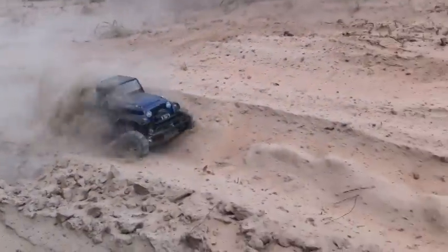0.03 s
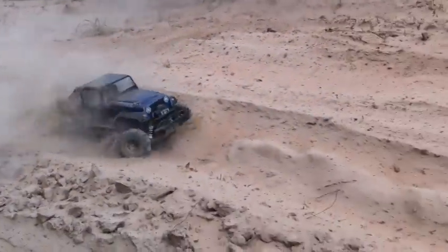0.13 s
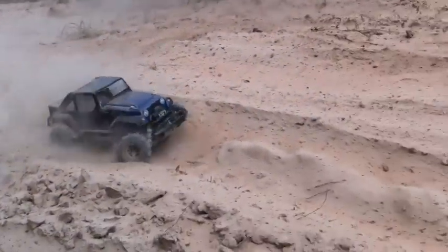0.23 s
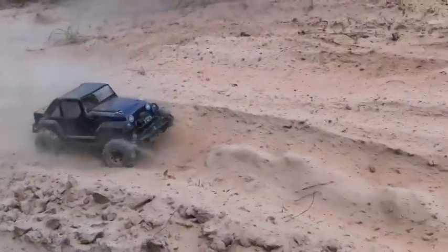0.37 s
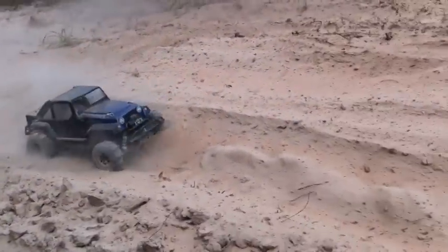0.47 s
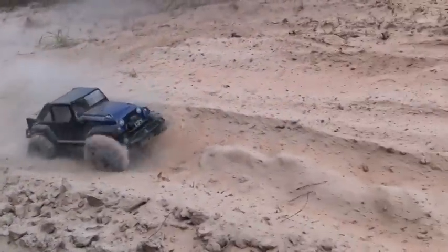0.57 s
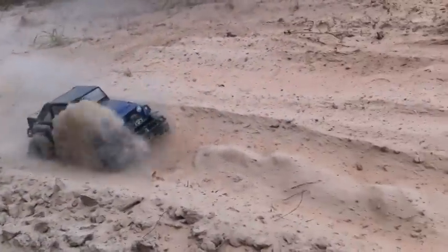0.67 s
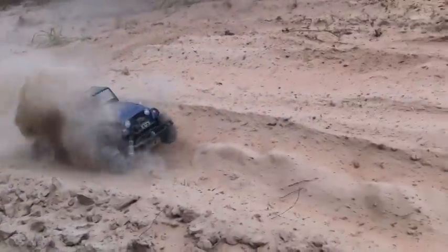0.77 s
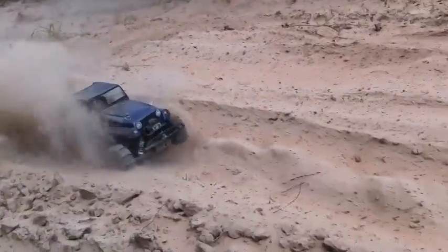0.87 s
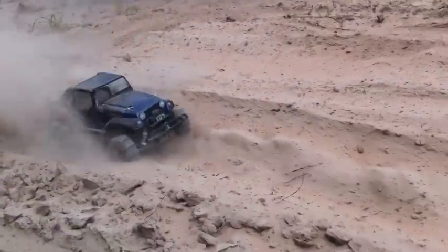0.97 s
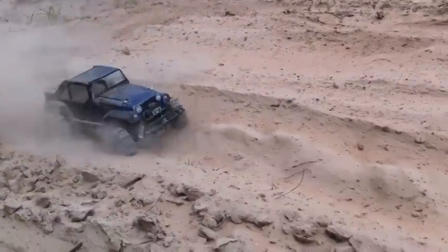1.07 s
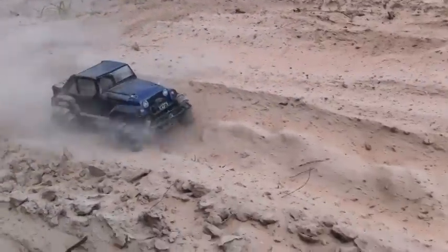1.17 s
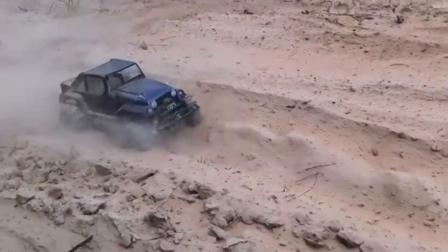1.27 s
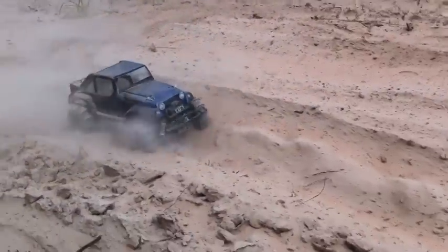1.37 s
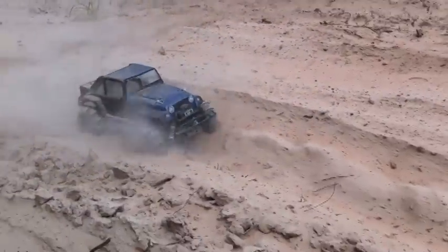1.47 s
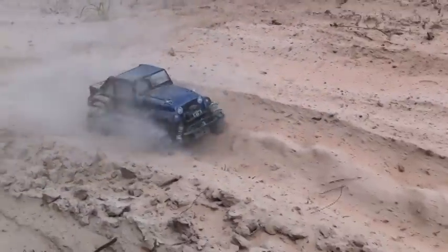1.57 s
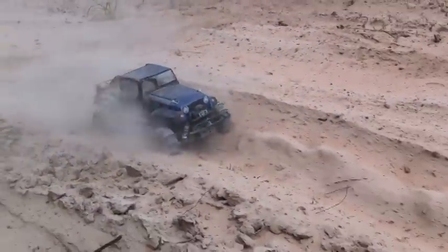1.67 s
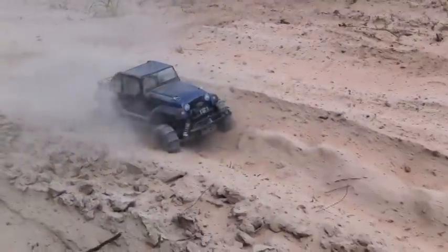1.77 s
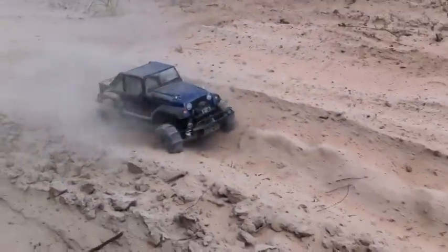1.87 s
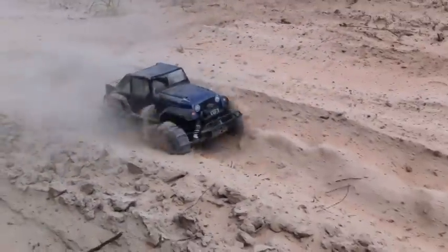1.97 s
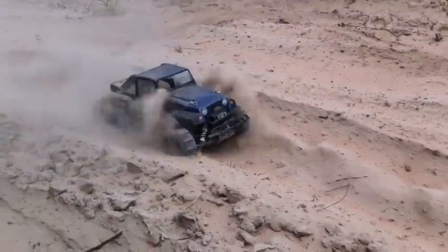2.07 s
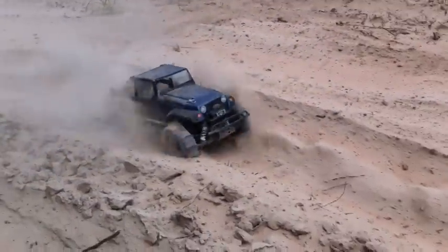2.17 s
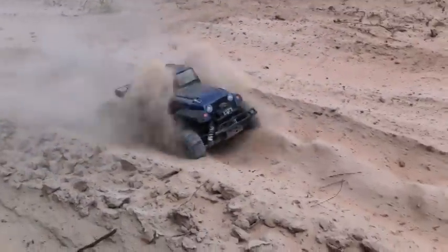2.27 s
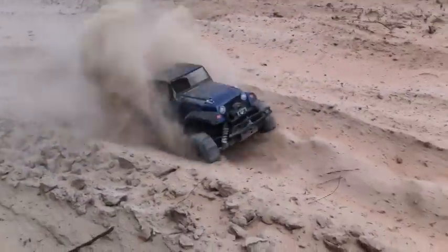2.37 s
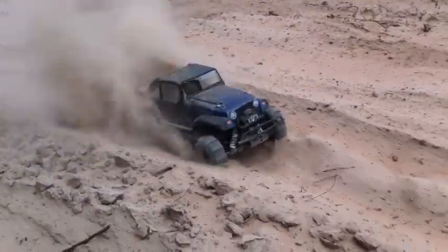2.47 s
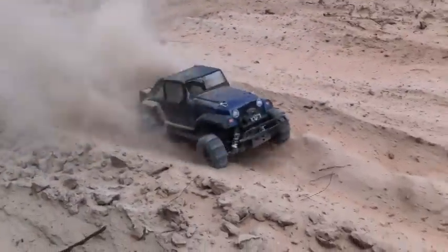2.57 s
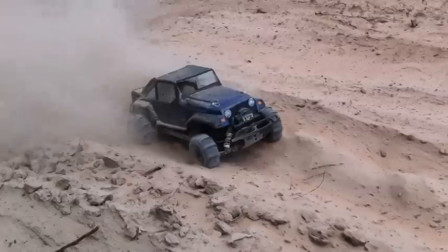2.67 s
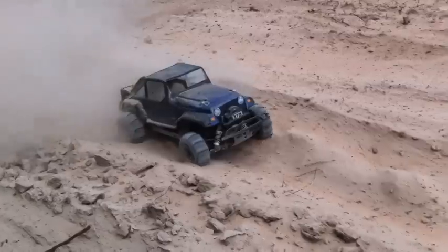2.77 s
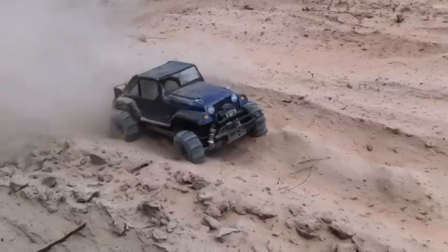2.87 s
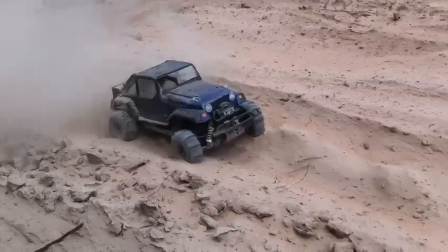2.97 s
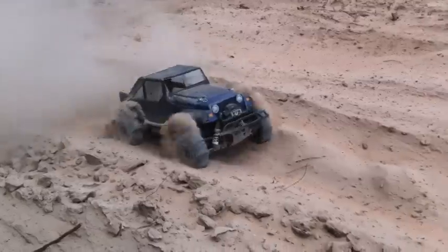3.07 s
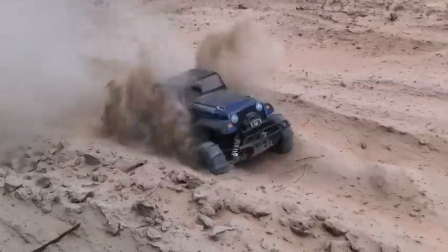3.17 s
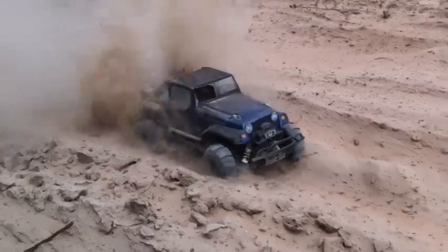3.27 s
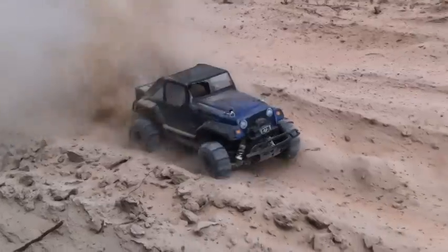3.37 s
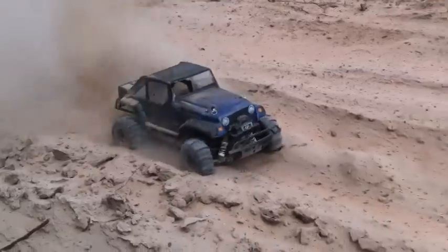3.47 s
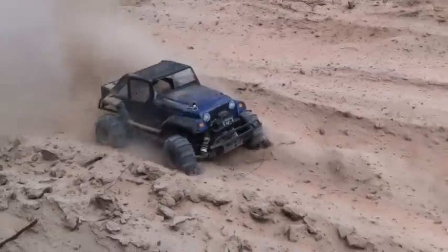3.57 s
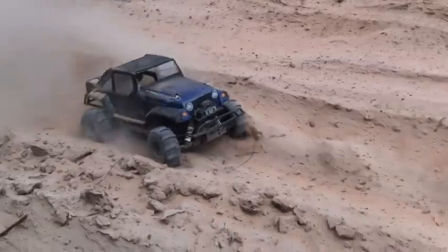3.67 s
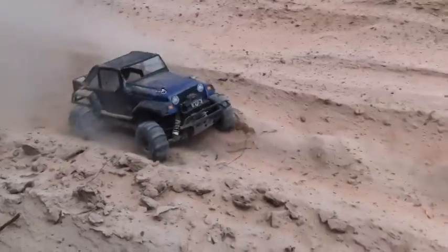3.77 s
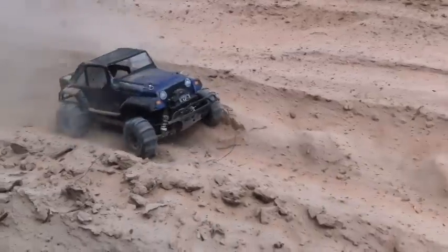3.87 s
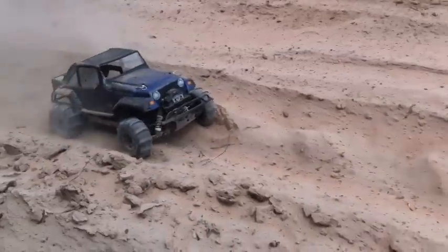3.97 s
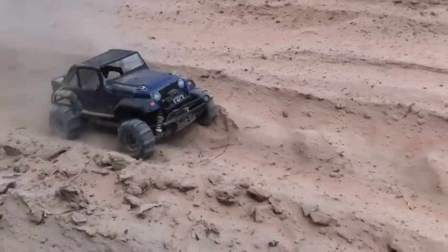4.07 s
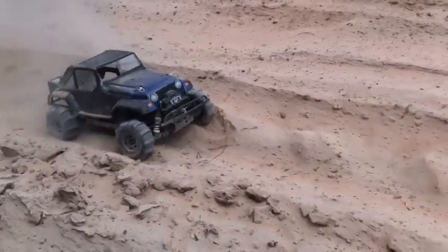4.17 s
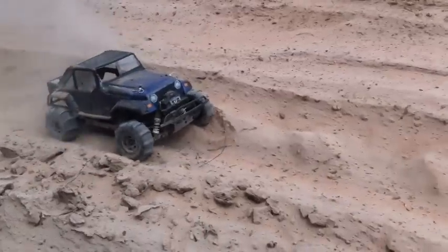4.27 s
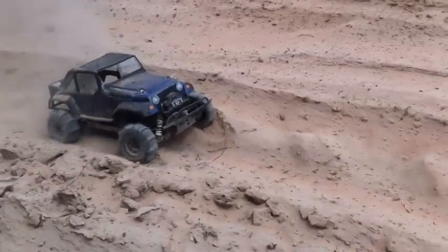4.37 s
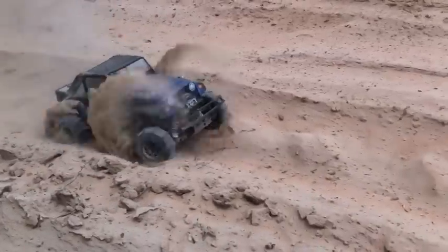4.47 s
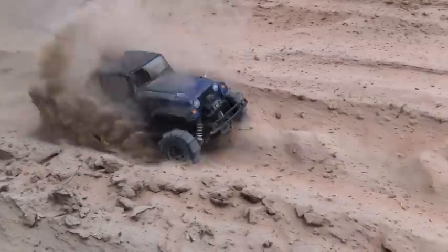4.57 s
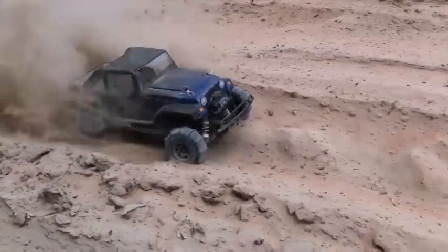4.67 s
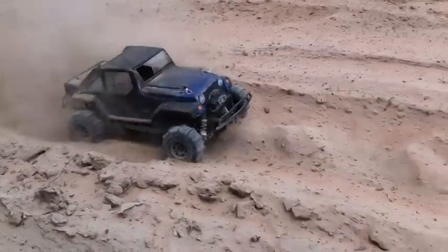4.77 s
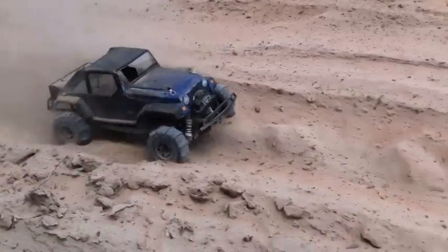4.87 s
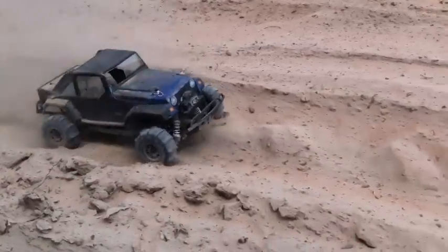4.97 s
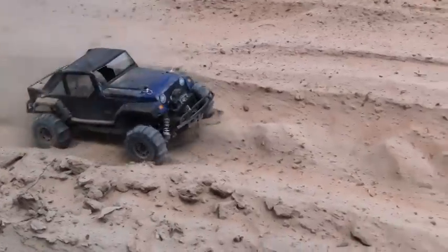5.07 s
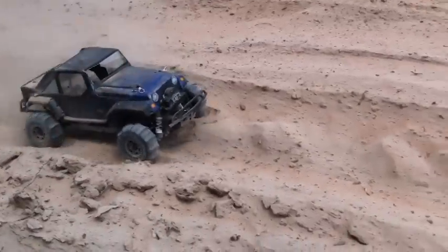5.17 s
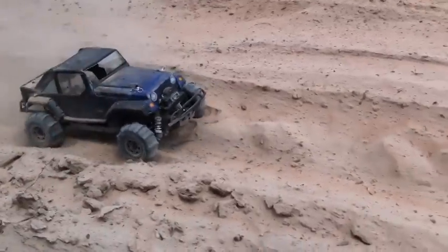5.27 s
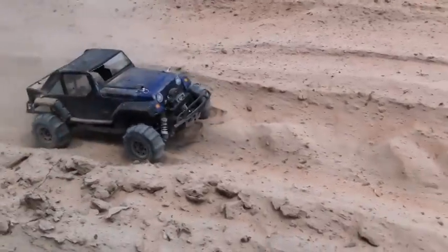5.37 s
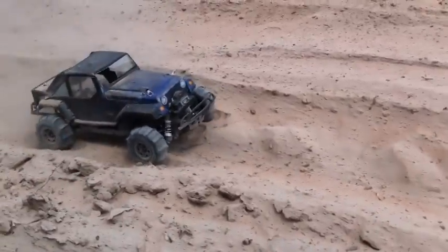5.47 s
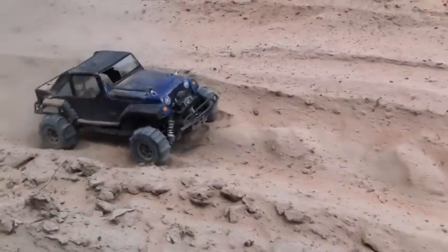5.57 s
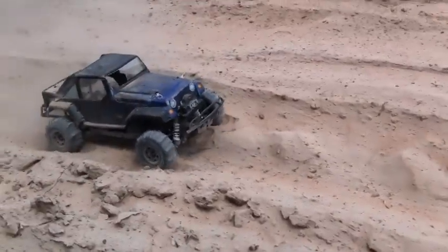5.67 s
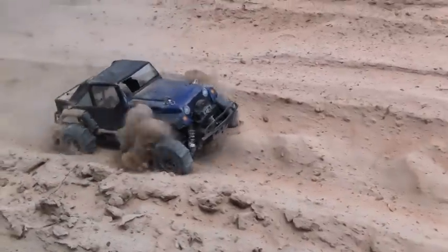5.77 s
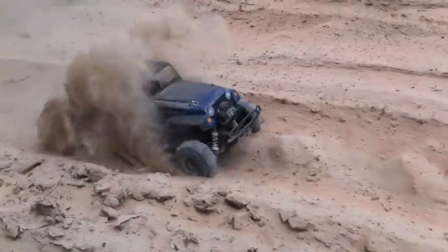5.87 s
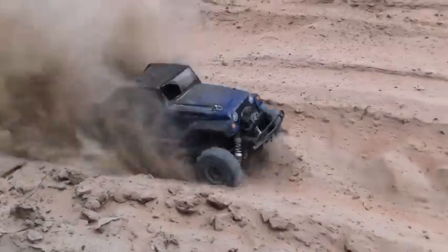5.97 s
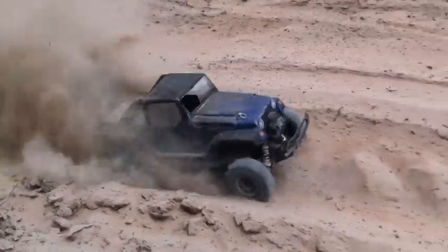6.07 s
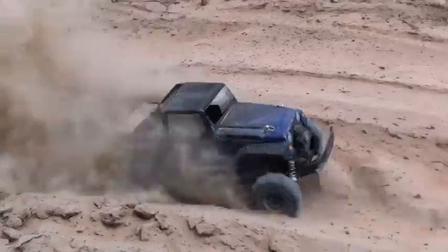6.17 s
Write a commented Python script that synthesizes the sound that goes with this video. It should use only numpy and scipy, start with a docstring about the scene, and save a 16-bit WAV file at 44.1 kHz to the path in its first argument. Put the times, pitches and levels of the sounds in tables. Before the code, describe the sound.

Outdoors on loose sand, a small electric truck revs and lets off again and again, its gears giving a high, gliding whine over rough grinding and scraping. After two quick bursts, a gust knocks on the nearby microphone. Four more bursts follow, each starting with a stuttering clatter, with light ticks of falling grit and faint servo whirs in the gaps. Low wind and a soft hiss lie underneath.

```python
"""On loose sand, a few metres from one microphone, an electric model truck digs its wheels in.
Throttle bursts kick off in jerks, then two gear stages whine over a gritty grind, ribbed by the thin
body shell. The speed controller whistles, the steering servo sings and thrown sand ticks down.
Wind rumbles and thumps on the microphone; a faint rush, a far drone and thin chirps sit in the hiss."""
import sys
import numpy as np
from scipy import signal
from scipy.fft import rfft, irfft
from scipy.io import wavfile
from scipy.ndimage import uniform_filter1d

SR = 44100
rng = np.random.default_rng(int(sys.argv[2]) if len(sys.argv) > 2 else 0)


def int16_out(signal):
    """Quantize to a 16-bit WAV file."""
    q = np.round(np.clip(np.atleast_2d(signal).T, -1, 1) * 32767)
    wavfile.write(sys.argv[1], SR, q.astype(np.int16))


N = 274743
TIME = np.arange(N) / SR


def undb(db):
    """Decibels to gain."""
    return 10 ** (np.asarray(db) / 20)


def unit(x):
    """Scales to rms 1."""
    return x / np.sqrt(np.mean(x ** 2))


def automation(table, fade_s=0.0071):
    """The samples a breakpoint table spans, a fade in and out, and one curve per column."""
    times, *cols = np.transpose(table)
    span = slice(int(times[0] * SR), min(int(times[-1] * SR), N))
    t = TIME[span]
    since_start = t - times[0] + (times[0] <= 0)  # no fade at either end of the scene
    until_stop = times[-1] - t + (span.stop >= N - 300)
    fade = np.clip(np.minimum(since_start, until_stop) / fade_s, 0, 1)
    return span, fade, [np.interp(t, times, col) for col in cols]


def region(start, stop, fade_s):
    """An event's samples, its fade in and out, and seconds since its start."""
    span, fade, (t,) = automation([(start, 0.), (stop, stop - start)], fade_s)
    return span, fade, t


def wander(rate_hz, size=N):
    """Smooth random modulation: sample and hold, slewed twice, spread near 1."""
    hold = int(SR / rate_hz)
    steps = np.repeat(rng.standard_normal(size // hold + 3), hold)
    return 1.4 * uniform_filter1d(uniform_filter1d(steps, hold), hold)[hold:hold + size]


def ring(x, hz, width_hz):
    """One resonance, gain 1 at the centre."""
    return signal.lfilter(*signal.iirpeak(hz, hz / width_hz, SR), x)


def colour(x, eq):
    """Shapes noise with an EQ curve of (freq_hz, gain_db) points; rms 1."""
    hz, db = np.transpose(eq)
    f = np.arange(len(x) // 2 + 1) * SR / len(x) + 1
    return unit(irfft(rfft(x) * undb(np.interp(np.log(f), np.log(hz), db)), len(x)))


def tone(hz, rough, flutter_db, skirt_hz):
    """A partial with a pure core and a noisy skirt; rough (0-1) is the skirt's share of the power."""
    skirt = (wander(skirt_hz, len(hz)) + 1j * wander(skirt_hz, len(hz))) / np.sqrt(2)
    rough = np.clip(rough, 0, 1)
    flutter = undb(flutter_db * wander(43.96, len(hz)))
    envelope = flutter * (np.sqrt(1 - rough) + np.sqrt(rough) * skirt)
    return np.sqrt(2) * np.imag(envelope * np.exp(2j * np.pi * np.cumsum(hz) / SR))


def shell(x, spacing_hz=330, width_hz=70, floor=.35):
    """Narrow, unevenly spaced resonances that give a ribbed sound, drawn at random for each event."""
    f = np.arange(len(x) // 2 + 1) * SR / len(x)
    modes = np.cumsum(spacing_hz * rng.uniform(.4, 1.6, 60))
    above = np.clip(np.searchsorted(modes, f), 1, len(modes) - 1)
    detune_hz = np.minimum(abs(f - modes[above]), abs(f - modes[above - 1]))
    gain = floor + 1 / np.sqrt(1 + (2 * detune_hz / width_hz) ** 2)
    return irfft(rfft(x) * gain / np.sqrt(np.mean(gain ** 2)), len(x))


# Pinion whine, one curve per throttle burst: time_s, pitch_hz, level_db
PINION_CURVES = [
    [(0.0, 2011, -21), (0.041, 2040, -25), (0.071, 2112, -29.5), (0.096, 1877, -33), (0.126, 1554, -49.5)],
    [(0.801, 1004, -49.5), (0.831, 1504, -42.5), (0.866, 2024, -43), (0.921, 1955, -45.5),
     (0.951, 1502, -41.5), (0.996, 1258, -46)],
    [(2.321, 608.1, -43.5), (2.356, 980.4, -38.5), (2.387, 1222, -34), (2.467, 1710, -29.5),
     (2.516, 1740, -34), (2.546, 1499, -30.5), (2.571, 1180, -38)],
    [(3.231, 1000, -33.5), (3.253, 1069, -39.5), (3.273, 1521, -34.5), (3.293, 1723, -39.5),
     (3.321, 1910, -36.5), (3.371, 1726, -43)],
    [(4.596, 1153, -40.5), (4.626, 1304, -34.5), (4.656, 1429, -33), (4.696, 1321, -40), (4.726, 1052, -33)],
    [(5.951, 1224, -38), (5.985, 1483, -30.5), (6.066, 1832, -32), (6.129, 2076, -22.5),
     (6.191, 2321, -24.5), (6.231, 2457, -35.5)],
]
# Slower gear stage, per burst: pitch_ratio to the pinion
SLOW_STAGE_RATIOS = [0.4, .4, .377, .39, .4, .356]
# Whine texture per burst, cleanest when the wheels spin free: roughness (0-1), waver_ratio
WHINE_TEXTURE = [(.25, .012), (.5, .02), (.18, .008), (.15, .01), (.4, .02), (.12, .005)]
# Layer mix at each burst's top speed: overtones_db, slow_stage_db
GEAR_MIX = [(-41.5, -67.5), (-51, -42), (-41, -38), (-42, -34.5), (-39, -37.5), (-36.5, -27)]


def gears(pinion_teeth=9, throb_teeth=28, throb_depth=.35, overtone_db_per_oct=9, stage_db_per_oct=18):
    """Meshing teeth whine: the pinion, two smeared overtones, a slower stage and the unbalanced shaft."""
    out = np.zeros(N)
    bursts = zip(PINION_CURVES, SLOW_STAGE_RATIOS, WHINE_TEXTURE, GEAR_MIX)
    for curve, ratio, (rough, waver), (overtones_db, stage_db) in bursts:
        span, fade, (hz, db) = automation(curve)
        octaves = np.log2(hz / hz.max())
        hz = hz * (1 + waver * wander(60, len(hz)))
        throb = 1 + throb_depth * tone(hz / throb_teeth, .3, 2, 30)  # once per turn of an eccentric gear
        mesh = undb(db) * throb * tone(hz, rough, 1, 250)
        overtones = tone(2 * hz, .72, 3, 600) + undb(-4) * tone(3 * hz, .95, 3, 1200)
        overtones *= undb(overtones_db + overtone_db_per_oct * octaves)
        overtones = shell(fade * overtones, floor=.3)  # they flare as they glide across shell modes
        stage = tone(ratio * hz, rough, 1, 120)
        shaft = undb(-14) * tone(hz / pinion_teeth, 0.147, 2, 45)
        low_whine = undb(stage_db + stage_db_per_oct * octaves) * (stage + shaft)
        out[span] += fade * (mesh + overtones + low_whine)
    return out


# Chassis resonances: pitch_hz, width_hz, gain_db
CHASSIS_MODES = [(766, 546, 21.5), (1610, 63, -33.5), (2193.6, 367, 20.5), (3220, 100, -33),
                 (4320, 56, -2.5), (5248, 360, 4.5), (6000, 73, -20), (6250, 95, -6.5), (6400, 80, -55),
                 (10650, 320, -28)]
# Broad chassis colour: freq_hz, gain_db
CHASSIS_EQ = [(260, -65.5), (450, -10.5), (734, 0), (1200, 0.5), (1810, 1), (2100, -2.5), (2510, -15),
              (5430, -14.5), (7410, -54), (12100, -22), (15600, -72)]


def chassis_noise(scatter_db=1.0, modes_db=-2, flare_db=3.5, crossover_hz=3200):
    """Dense tooth and grit impacts through the chassis, each mode flaring alone; low and high bands."""
    impacts = rng.standard_normal(N) * undb(scatter_db * rng.exponential(size=N))
    modes = sum(undb(db + flare_db * wander(45)) * ring(impacts, hz, width_hz)
                for hz, width_hz, db in CHASSIS_MODES)
    sound = colour(impacts, CHASSIS_EQ) + undb(modes_db) * unit(modes)
    f = np.arange(N // 2 + 1) * SR / N
    low = irfft(rfft(sound) / (1 + (f / crossover_hz) ** 6), N)
    return unit(low), unit(sound - low)


# Wheelspins per burst: four times_s (once sorted: start, full, lift, stop), level_db, relative treble_db
WHEELSPINS = [
    [(-.05, 0, 0.0978, 0.2293, -35, 0), (.12, .17, 0.341, 0.438, -53, -15),
     (.435, .45, 0.511, .62, -52.5, -6)],
    [(.72, 0.847, 0.9498, 1.03, -38, -7.5)],
    [(1.98, 2.05, 2.294, 2.12, -44, -15.5), (2.11, 2.15, 2.181, 2.235, -40.5, -13),
     (2.23, 2.26, 2.346, 2.31, -55, -7.5), (2.3, 2.43, 2.5485, 2.6, -34.5, -2.5),
     (2.57, 2.6, 2.67, 2.72, -57.5, -2)],
    [(3.115, 3.125, 3.66, 3.2, -49, -12), (3.17, 3.27, 3.35, 3.39, -32.5, -7),
     (3.35, 3.37, 3.46, 3.445, -48, -3), (3.445, 3.455, 3.465, 3.52, -55.5, -5)],
    [(4.57, 4.63, 4.71, 4.745, -34.5, -6), (4.71, 4.735, 4.76, 4.92, -53, -0.5)],
    [(5.86, 5.985, 6.615, 6.3, -31, -6.5)],
]
# The ring that stands out as the truck turns, per burst: pitch_hz, width_hz, relative level_db
RASP_RINGS = [(3700, 300, -10), (3000, 300, -12), (5300, 300, -10), (5550, 350, -6), (2700, 130, -5),
              (4200, 500, -8)]


def grind(swell_db=14, decay_db=30, brighten_db_per_s=30):
    """Drivetrain noise as the tyres grip and slip: each spin swells, brightens with speed and fades."""
    low, high = chassis_noise()
    out = np.zeros(N)
    for spins, (hz, width_hz, rasp_db) in zip(WHEELSPINS, RASP_RINGS):
        loudest_db = max(spin[4] for spin in spins)
        for *times, level_db, treble_db in spins:
            start, full, lift, stop = sorted(times)
            span = slice(max(int(start * SR), 0), min(int(stop * SR), N))
            t = TIME[span]
            db = level_db - np.interp(t, [start, full, lift, stop], [swell_db, 0, 0, decay_db])
            fade = np.clip(np.minimum(t - start, stop - t) / .006, 0, 1)
            treble = undb(treble_db + brighten_db_per_s * (np.minimum(t, lift) - full)) * high[span]
            grip_db = 0.21 * wander(61.66, len(t))
            # the rasp falls away faster than the grind
            rasp_gain = undb(rasp_db + db - loudest_db + 1.19 * wander(50, len(t)))
            rasp = rasp_gain * unit(ring(rng.standard_normal(len(t)), hz, width_hz))
            out[span] += fade * undb(db + grip_db) * shell(low[span] + treble + rasp)
    return out


# Controller whistle on open throttle: start_s, stop_s, level_db
WHISTLE_CUES = [(0, .2, -61.5), (.2, .5, -68), (.65, 1.102, -59.5), (1.95, 2.5, -61), (3.11, 3.35, -60.5),
                (4.5, 4.7, -57.5), (5.82, 6.01, -53.5)]


def controller_whistle(pitch_hz=12169, sag_db_per_s=14):
    """The speed controller chops the current at a constant rate: a thin, high whistle."""
    out = np.zeros(N)
    for start, stop, db in WHISTLE_CUES:
        span, fade, t = region(start, stop, fade_s=0.0257)
        out[span] += fade * undb(db - sag_db_per_s * t) * tone(np.full(len(t), pitch_hz), .3, 2, 120)
    return out


# Wind fader moves: time_s, level_db, relative upper_edge_db
WIND_CURVE = [(0.0, -39, -36), (0.35, -43.5, -20), (0.6, -40, -21.5), (1.2, -33.5, -19.5),
              (1.45, -34, -24.5), (1.96, -40.5, -23.5), (2.69, -40.5, -30), (2.95, -46, -23),
              (3.33, -43.5, -29), (4.09, -49, -17), (4.53, -48.5, -21), (4.77, -45, -18),
              (5.43, -45.5, -31), (5.88, -45.5, -25), (6.23, -41.5, -25)]
# Rumble colour: freq_hz, gain_db
RUMBLE_EQ = [(12, -75), (20, -6.5), (54, -30), (96, -4.5), (152, 0), (211, -5), (256, -8), (321, -4),
             (464, -12), (681, -25.5), (797, -38), (1040, -38.5), (1300, -38), (1690, -43), (2860, -120)]


def wind():
    """Wind on the microphone: third-octave bands flicker separately, and gusts open an upper edge."""
    times, *levels_db = np.transpose(WIND_CURVE)
    db, edge_db = (np.interp(TIME, times, level_db) for level_db in levels_db)
    air = colour(rng.standard_normal(N), RUMBLE_EQ)
    bands_hz = 30 * 2 ** np.arange(0, 5.6, 1 / 3)
    rumble = unit(sum(undb(3 * wander(12)) * ring(air, hz, hz / 3) for hz in bands_hz))
    upper_edge = unit(ring(ring(rng.standard_normal(N), 812, 300), 803, 234))
    return undb(db) * (rumble + undb(edge_db) * upper_edge)


def rush(centre_hz=1976, bed_db=-82, peak_s=1.21, peak_db=-58, rise_db_per_s=43, fall_db_per_s=28):
    """A faint, airy bed that swells once."""
    past_peak = TIME - peak_s
    swell_db = peak_db - np.maximum(-rise_db_per_s * past_peak, fall_db_per_s * past_peak)
    air = unit(ring(ring(rng.standard_normal(N), centre_hz, 1800), centre_hz, 1800))
    return undb(np.maximum(bed_db, swell_db) + 1.2 * wander(25.43)) * air


# Noise floor colour: freq_hz, gain_db
HISS_EQ = [(530, -48), (900, -11.5), (955, -7.5), (1840, -12), (2360, -10), (2570, -11), (15600, -16)]


def hiss(level_db=-64.5):
    """A steady noise floor under everything."""
    return undb(level_db) * colour(rng.standard_normal(N), HISS_EQ)


# Motor jerks: start_s, level_db, ring_hz, relative treble_db, length_s
JERK_HITS = [(0.177, -37, 1950, -13, 0.0256), (0.667, -32, 875, -4.5, 0.0252),
             (0.69, -33, 869, -6.5, 0.0176), (0.707, -28.5, 1106, -5.5, 0.01787),
             (0.766, -34, 1190, -8, 0.0216), (1.98, -37.5, 1987, -3.5, 0.017),
             (1.997, -34, 1360, -9, 0.0192), (2.038, -32.5, 816, -1.5, 0.0163),
             (2.05, -25, 1640, -4.5, 0.0153), (2.068, -28, 1906, -2.5, 0.0164),
             (2.082, -27.5, 1918, -0.5, 0.0115), (2.101, -23.5, 1331, -10, 0.0108),
             (2.122, -28.5, 770, -11, 0.0105), (2.246, -41.5, 1610, -7.5, 0.0086),
             (2.26, -36, 1770, -8.5, 0.0097), (2.278, -32, 1484, -9, 0.0215),
             (2.314, -31, 874, 3.5, 0.0055), (2.336, -29, 824, -3.5, 0.029),
             (2.608, -37.5, 1990, -1.5, 0.0265), (2.634, -45, 1336, 7.5, 0.0099),
             (3.123, -37, 2330, -5.5, 0.0105), (3.138, -31.5, 2376, -17, 0.0168),
             (3.185, -26.5, 1541, -0.5, .019), (3.205, -29, 1405, -7.5, 0.0086),
             (3.219, -24.5, 2130, -0.5, 0.00995), (3.401, -33.5, 1900, 4, 0.0207),
             (3.452, -32, 2000, 5, 0.0112), (4.506, -32.5, 890.7, -14.5, 0.033),
             (4.537, -31.5, 784, -8, 0.0146), (4.55, -22.5, 1144, -13.5, 0.0212),
             (4.581, -27, 900, -11.5, 0.0177), (4.593, -25.5, 933.6, -10, 0.0843),
             (4.779, -41, 1935, -8.5, 0.029), (5.832, -47, 789, 1.5, 0.0097),
             (5.843, -37, 788, 0.5, 0.0185), (5.856, -24.5, 1227, -5.5, 0.0189),
             (5.873, -28, 1023, -9.5, 0.0165), (5.889, -23.5, 1480, -4.5, 0.0186),
             (5.927, -19.5, 2202, -1.5, .017)]


def jerks(skew=.75, trim_db=-9):
    """The motor jerks against the gear play: each short shake favours one ring of the chassis."""
    low, high = chassis_noise()
    out, t = np.zeros(N), TIME[:SR // 10]
    tail = .1 * np.exp(-t / .02)
    for start, db, hz, treble_db, length in JERK_HITS:
        span = slice(int(start * SR), int(start * SR) + len(t))
        shake = shell(low[span] + 0.766 * unit(ring(low[span], hz, 53.3)) + undb(treble_db) * high[span])
        swell = np.sin(np.pi * np.clip(t / length, 0, 1) ** skew)
        out[span] += undb(db + trim_db) * shake * (swell + tail)
    return out


# Single grains landing: start_s, level_db, ring_hz, relative treble_db
SAND_HITS = [(0.416, -40.5, 3690, 2.5), (0.451, -32.5, 2000, -6), (0.47, -32.5, 1690, -11.5),
             (0.479, -38.5, 2910, 3.5), (0.515, -42, 2900, 1.5), (0.529, -39.5, 4600, 2),
             (1.048, -31.5, 3470, -15), (1.328, -39.5, 2150, -9), (2.754, -43, 2220, -18.5),
             (2.787, -40, 5300, -28), (3.52, -39.5, 2100, -22.5), (3.534, -39.5, 2100, -21),
             (3.548, -42, 1770, -17.5), (3.685, -47, 1500, -19.5), (3.765, -46.5, 1800, -20),
             (3.899, -51.5, 2440, -1.5), (4.017, -45.5, 3290, -4), (4.067, -43.5, 2020, -16.5),
             (4.728, -37.5, 2270, 5), (4.817, -40.5, 3670, 5.5), (4.873, -43.5, 3733, -2),
             (4.945, -44, 6150, -12), (4.96, -44.5, 3860, -11), (4.988, -41.5, 4420, -3),
             (5.146, -41.5, 1670, -19)]


def sand_ticks(t60_s=0.0257, trim_db=-7, patter_s=(4.85, 5.15), patter_db=-54.5, patter_hz=3500):
    """Thrown grit cracks on body and ground: a broad ring with a bright edge."""
    out, t = np.zeros(N), TIME[:SR // 10]
    envelope = (1 - np.exp(-t / 0.00067)) * undb(-60 * t / t60_s)
    # the last grains of a throw land at random
    patter = [(np.interp(when, [0, 1], patter_s), patter_db + 8 * size, patter_hz * 2 ** (pitch - .5), -5)
              for when, size, pitch in rng.uniform(size=(6, 3))]
    for start, db, hz, treble_db in [*patter, *SAND_HITS]:
        noise = rng.standard_normal(len(t))
        bright = unit(ring(ring(noise, 9650, 7000), 9650, 7000))
        crack = unit(ring(noise, hz, hz / 2)) + undb(treble_db) * bright
        i = int(start * SR)
        out[i:i + len(t)] += undb(db + trim_db) * crack * envelope
    return out


# Steering moves: start_s, peak_s, stop_s, start_hz, peak_hz, stop_hz, first_db, second_db, third_db
SERVO_MOVES = [(.471, 0.502, .676, 2710, 3070, 2182, -50.5, -53, -61.5),
               (1.171, 1.202, 1.276, 1920, 1912, 2062, -73, -65, -85.5),
               (3.951, 3.975, 4.02, 1940, 2170, 2103, -83, -85, -67.5),
               (4.081, 4.1, 4.14, 2087, 2107, 2127, -85, -85, -72.5),
               (4.201, 4.268, 4.331, 1953, 2157, 2081, -66, -72, -57)]
# Servo rasp per move: roughness (0-1), multiplied by the partial number
SERVO_ROUGHNESS = [.2, .15, .33, .33, .33]


def servo(settle_s=.04, first_db_per_oct=55, third_db_per_oct=-15):
    """The steering servo's small geared motor: three wavering partials in scratchy gear noise."""
    out = np.zeros(N)
    scratch = rng.standard_normal(N) * undb(2.34 * wander(160))
    gear_noise = unit(ring(scratch, 5900, 1500)) + undb(-3) * unit(ring(scratch, 10800, 4500))
    waver = 1 + .008 * wander(60)
    for move, rough in zip(SERVO_MOVES, SERVO_ROUGHNESS):
        start, peak, stop, *pitches_hz, first_db, second_db, third_db = move
        span, fade, t = region(start, stop, fade_s=.012)
        settled = max(stop - settle_s, peak + .01)
        glide_hz = np.interp(t + start, [start, peak, settled], pitches_hz)
        hz = uniform_filter1d(glide_hz, size=SR // 50, mode="nearest")
        # as the pitch drops the weight shifts from the first partial to the third
        octaves = np.log2(hz / hz.max())
        first_db += first_db_per_oct * octaves
        third_db += third_db_per_oct * octaves
        partials = sum(undb(db) * tone(k * hz * waver[span], rough * k, 2.5, 350)
                       for k, db in enumerate([first_db, second_db, third_db], 1))
        out[span] += fade * (partials + undb(third_db - 3) * gear_noise[span])
    return out


# Wind pops: start_s, level_db, pitch_hz
GUST_HITS = [(1.03, -19.5, 150.7), (1.043, -21, 191.6), (1.088, -19.5, 123.1), (1.115, -15, 210),
             (1.129, -19, 154), (1.181, -15.5, 208), (1.199, -23, 168.7)]


def gust_thumps():
    """Gusts knock the microphone's membrane: a cycle or two of bass each."""
    out, t = np.zeros(N), TIME[:SR // 10]
    envelope = np.exp(-((t - .01) / 0.00452) ** 2)
    for start, db, hz in GUST_HITS:
        i = int(start * SR)
        out[i:i + len(t)] += undb(db) * np.sin(2 * np.pi * hz * t) * envelope
    return out


def drone(start_s=1.1, stop_s=1.85, from_hz=621, to_hz=855, glide_s=0.17, db=-49.5, sag_db_per_s=29):
    """A blurred tone from far off glides up and fades."""
    out = np.zeros(N)
    span, fade, t = region(start_s, stop_s, fade_s=.02)
    hz = to_hz - (to_hz - from_hz) * np.exp(-t / glide_s)
    out[span] = fade * undb(db - sag_db_per_s * t) * tone(hz, 0.65, 1.5, 50.57)
    return out


# Faint chirps: start_s, stop_s, start_hz, stop_hz, level_db
CHIRP_CUES = [(3.72, 3.79, 3600, 3500, -76), (3.845, 3.87, 3900, 3400, -72), (3.97, 4.09, 3350, 3150, -76)]


def chirps():
    """Thin falling whistles, perhaps a far bird, half buried in the hiss."""
    out = np.zeros(N)
    for start, stop, start_hz, stop_hz, db in CHIRP_CUES:
        span, fade, t = region(start, stop, fade_s=0.0093)
        out[span] += fade * undb(db) * tone(np.linspace(start_hz, stop_hz, len(t)), .3, 2, 150)
    return out


def scene():
    """Truck, sand and ambience in mono: one microphone feeds both channels."""
    truck = gears() + grind() + jerks() + servo() + controller_whistle()
    mono = truck + hiss() + sand_ticks() + wind() + rush() + gust_thumps() + drone() + chirps()
    return np.array([mono, mono])


def record(dry, low_cut_hz=70, high_cut_hz=15700):
    """The camera thins the deep bass and cuts the top."""
    thinned = signal.sosfilt(signal.butter(2, low_cut_hz, "high", fs=SR, output="sos"), dry)
    return signal.sosfilt(signal.ellip(12, .5, 70, high_cut_hz, fs=SR, output="sos"), thinned)


dry = scene()
out = record(dry)
int16_out(out)
```